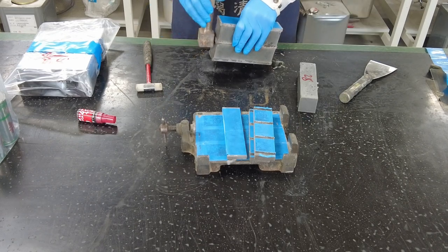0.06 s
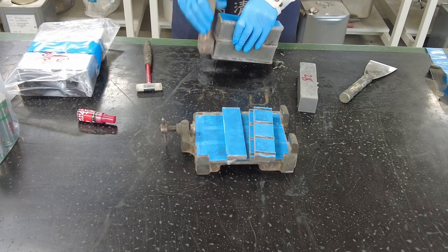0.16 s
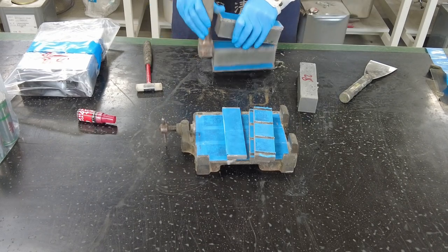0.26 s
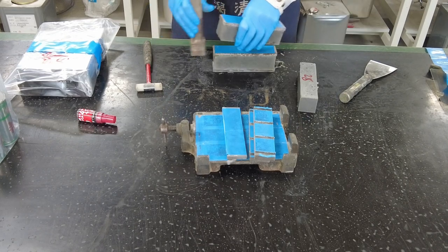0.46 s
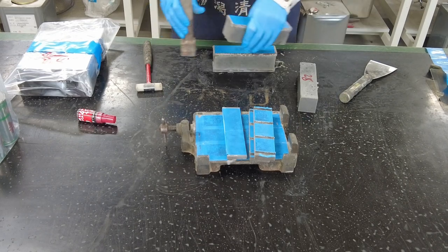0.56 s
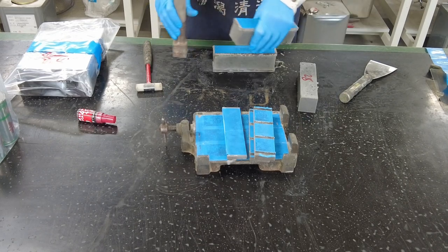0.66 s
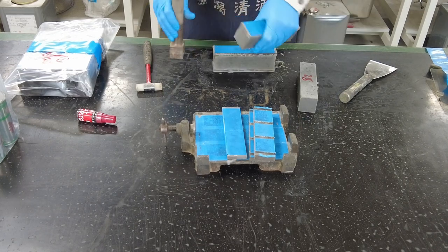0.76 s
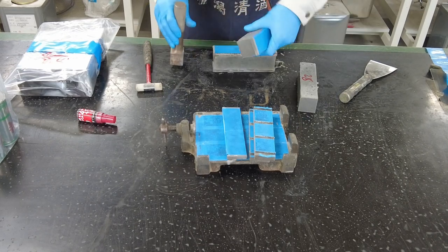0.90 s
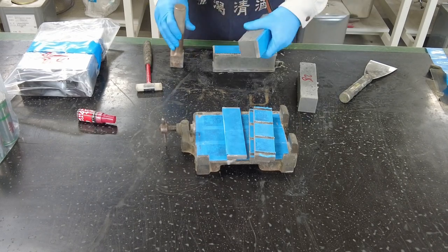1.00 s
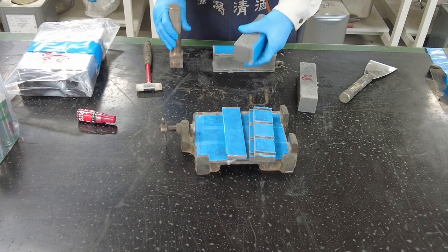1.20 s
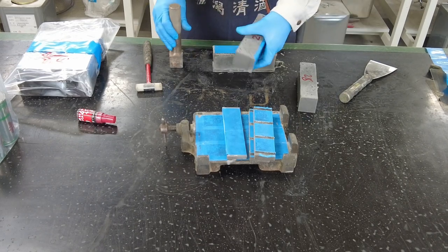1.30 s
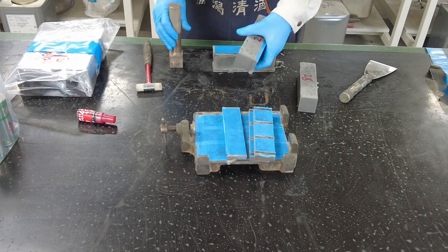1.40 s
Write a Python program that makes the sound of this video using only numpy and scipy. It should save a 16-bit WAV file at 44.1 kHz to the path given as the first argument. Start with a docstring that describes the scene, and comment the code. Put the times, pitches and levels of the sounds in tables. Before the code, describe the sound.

Hard pieces clack together and thud onto a workbench over a steady workshop hum.

```python
"""Mould pieces on a workbench

Hard mould pieces clack together and rasp apart; each impact excites their damped normal modes.
One is set down and rocks to rest in a quick run of thuds that drive the booming modes of the bench top.
Faint brushing and a soft nudge follow. A reverberant workshop prolongs the knocks
over steady ventilation noise and machine hum."""
import sys
import numpy as np
from scipy import signal
from scipy.fft import rfft, irfft
from scipy.io import wavfile

SR = 44100
rng = np.random.default_rng(int(sys.argv[2]) if len(sys.argv) > 2 else 0)


def generate_wav(signal):
    """Clip the signal to [-1, 1] and save it as 16-bit WAV at the path in sys.argv[1]."""
    frames = np.transpose(np.atleast_2d(signal))
    scaled = np.clip(frames, -1, 1) * 32767
    pcm = np.round(scaled).astype(np.int16)
    wavfile.write(sys.argv[1], SR, pcm)


N = 63945


def amp(db):
    """Amplitude ratio of a level in decibels."""
    return 10 ** (np.asarray(db) / 20)


def unit_rms(x):
    """Normalisation to unit mean power."""
    return x / np.sqrt(np.mean(abs(x) ** 2) + 1e-20)


def curve_at(points, hz):
    """Interpolation on a logarithmic frequency axis."""
    f, value = np.transpose(points)
    return np.interp(np.log(hz + 1), np.log(f + 1), value)


def add(mix, start_s, sound):
    """Superposition of a delayed sound on the mix."""
    part = mix[round(start_s * SR):][:len(sound)]
    part += sound[:len(part)]


def correlate_pair(z, correlation):
    """Partial coherence: the weighted sum and difference of two independent signals."""
    correlation = np.clip(correlation, -1, 1)
    mid = np.sqrt((1 + correlation) / 2) * z[0]
    side = np.sqrt((1 - correlation) / 2) * z[1]
    return np.array([mid + side, mid - side])


def click(spectrum, size=2048):
    """Minimum phase: the most compact causal pulse with a given spectrum."""
    log_gain = np.log(amp(curve_at(spectrum, abs(np.fft.fftfreq(size, 1 / SR)))))
    return np.fft.ifft(np.exp(np.conj(signal.hilbert(log_gain)))).real


def ring(modes):
    """Free vibration: a sum of exponentially damped normal modes."""
    t = np.arange(N) / SR
    return sum(amp(db - 60 * t / t60) * np.cos(2 * np.pi * hz * t) for hz, db, t60 in modes)


def highpass(x, low_hz):
    """First-order high-pass: light contacts excite mainly the treble."""
    return signal.sosfilt(signal.butter(1, low_hz, "high", fs=SR, output="sos"), x)


def bandpass(x, low_hz, high_hz):
    """Band-limited excitation: the softer the contact, the lower its upper cutoff."""
    return signal.sosfilt(signal.butter(6, high_hz, fs=SR, output="sos"), highpass(x, low_hz))


# Spectral density of the background air: f/Hz, relative level/dB
AIR_SPECTRUM = [(10, -13), (28, 2.5), (48, -13.5), (72, -16), (100, -18), (170, -21.5), (420, -25),
                (580, -19.5), (700, -21), (880, -23.5), (1050, -30), (1750, -32.5), (2200, -40),
                (2800, -35), (3300, -44.5), (4600, -42.5), (6500, -49.5), (10000, -61.5), (16000, -69)]
# Its left-right coherence: f/Hz, correlation
AIR_COHERENCE = [(30, 0.93), (130, 1), (300, 0.79), (550, 0.3), (800, .1), (1500, 0.45), (3500, .05),
                 (12000, 0.058)]
def air(rms_db=-41.5):
    """Stationary noise: rumble and ventilation hiss, most coherent at long wavelengths."""
    hz = np.fft.rfftfreq(N, 1 / SR)
    white = correlate_pair(rfft(rng.standard_normal((2, N))), curve_at(AIR_COHERENCE, hz))
    return amp(rms_db) * unit_rms(irfft(white * amp(curve_at(AIR_SPECTRUM, hz)), N))


# Machine tones: f/Hz, rms level/dB
HUM_TONES = [(500.6, -53.5), (597.5, -51), (796.7, -66.5), (1174, -66), (1771, -68), (2724, -72.5)]
def machine_hum(waver_depth=0.47, waver_hz=12.5, correlation=0.74):
    """Narrow-band random modulation: machine tones waver on their way across the hall."""
    t, out = np.arange(N) / SR, np.zeros((2, N))
    waver_band = np.exp(-(np.fft.fftfreq(N, 1 / SR) / waver_hz) ** 2)
    steady = np.exp(0.5j * np.arccos(correlation) * np.array([[1], [-1]]))  # left and right phasors
    for hz, db in HUM_TONES:
        noise = rng.standard_normal((2, N)) + 1j * rng.standard_normal((2, N))
        drift = unit_rms(np.fft.ifft(waver_band * noise))
        envelope = steady + waver_depth * correlate_pair(drift, correlation)
        out += amp(db) * unit_rms((envelope * np.exp(2j * np.pi * hz * t)).real)
    return out


# Left-right coherence of the reflections: f/Hz, correlation
ECHO_COHERENCE = [(100, 1), (250, 0.89), (500, 0.43), (900, -0.17), (2000, 0.6), (8000, -0.36)]
def diffuse_noise():
    """Diffuse field: sound from all sides reaches two nearby points alike only in the bass."""
    correlation = curve_at(ECHO_COHERENCE, np.fft.rfftfreq(N, 1 / SR))
    return irfft(correlate_pair(rfft(rng.standard_normal((2, N))), correlation), N)


# Reverberation time of the workshop: f/Hz, T60/s
TAIL_T60 = [(80, 0.93), (250, 1.19), (750, 0.93), (1400, 1.23), (3000, 0.97), (7000, 0.62), (14000, 0.16)]
# Gain of its tail before the build-up is applied: f/Hz, level/dB
TAIL_SPECTRUM = [(60, 1), (150, 3.5), (300, 1), (500, -0.5), (750, 10), (1000, -4), (1400, -1),
                 (2000, -5.5), (4500, -6.5), (7500, -9), (9000, -6), (14000, -18)]
def workshop(x, early_db=-5, early_delay_s=0.0049, early_t60_s=0.16, tail_delay_s=0.004, build_s=0.073):
    """Reverberation: early reflections off bench and shelves, then the hall's exponential tail."""
    t = np.arange(N) / SR
    early = diffuse_noise() * (t > early_delay_s) * amp(-60 * t / early_t60_s)
    early *= amp(early_db) / np.linalg.norm(early[0])
    hz, frame_s, bands = signal.stft(diffuse_noise(), SR, nperseg=512)
    decay_rate = np.log(1000) / curve_at(TAIL_T60, hz)[:, None]
    decay = np.exp(-decay_rate * frame_s) * np.sqrt(2 * decay_rate / SR)  # unit energy in each band
    bands = bands * amp(curve_at(TAIL_SPECTRUM, hz))[:, None] * decay
    tail = signal.istft(bands, SR, nperseg=512)[1][:, :N]
    tail *= np.clip((t - tail_delay_s) / build_s, 0, 1)
    return signal.fftconvolve(x[None], early + tail, axes=1)[:, :N]


# Friction noise: f/Hz, relative level/dB
SCUFF_SPECTRUM = [(100, -22), (7000, -33), (9500, -15), (10800, -13.5), (12300, -11), (13800, -4),
                  (15700, -13.5)]
# Brushing strokes: t/s, rise/s, decay/s, level/dB
SCUFF_STROKES = [(0.3277, .0008, 0.002, -31), (1.044, 0.028, .025, -73), (1.315, 0.011, 0.016, -69)]
def scuffs():
    """Sliding friction: an edge or a glove gives a short, thin hiss."""
    t, out = np.arange(SR // 5) / SR, np.zeros(N)
    for start_s, rise_s, decay_s, db in SCUFF_STROKES:
        hiss = signal.fftconvolve(rng.standard_normal(len(t)), click(SCUFF_SPECTRUM))[:len(t)]
        envelope = np.minimum(t / rise_s, 1) * np.exp(-np.maximum(t - rise_s, 0) / decay_s)
        add(out, start_s, amp(db) * unit_rms(hiss) * envelope)
    return out


# Normal modes of the bench top: f/Hz, level/dB, T60/s
BENCH_TOP_MODES = [(51, -34.5, .22), (100, -39.5, 1.5), (106.7, -33.5, 0.92), (184.9, -29.5, 1.6),
                   (199, -25.5, 0.12), (299.5, -23, 0.096), (404.5, -33, 0.93), (475.7, -27, .09),
                   (536, -20.5, .085), (544, -40.5, 0.92), (659, -41, 0.5), (763, -38, 0.83),
                   (804, -41, 1.1), (973, -20.5, 0.044), (1159, -21, 0.051), (1292, -30, 0.035),
                   (1490, -33, 0.085)]
def bench_top(push_db=20.5):
    """Impulse response of the bench top: a sharp push, then free vibration."""
    response = ring(BENCH_TOP_MODES)
    response[0] += amp(push_db)
    return -response


def nudge(start_s=1.058, gain_db=-11, damping_s=0.085):
    """Added damping: a hand bumps the bench and at once deadens its low modes."""
    t, out = np.arange(N) / SR, np.zeros(N)
    bump = bandpass(bench_top(), low_hz=40, high_hz=102)
    add(out, start_s, amp(gain_db) * bump * np.exp(-t / damping_s))
    return out


# Spectrum of a bare contact: f/Hz, level/dB
CONTACT_SPECTRUM = [(100, -28), (650, 0), (1000, 15), (1900, 1), (3000, 8.5), (3550, 1), (4300, 4.5),
                    (5800, -1), (6500, -6), (8200, 0), (10000, -12.5), (16000, -21)]
def contact(rise_s=0.001, decay_s=0.0019):
    """Rough-surface contact: gritty faces seat in a burst of tiny impacts, heard as a crack."""
    t = np.arange(SR // 40) / SR
    grit = rng.standard_normal(len(t)) * np.minimum(t / rise_s, 1) * np.exp(-t / decay_s)
    return signal.fftconvolve(grit / np.linalg.norm(grit), click(CONTACT_SPECTRUM))


def rasp(start_s=0.243, gain_db=-7.5, catches_per_s=2200, fade_s=0.03):
    """Stick-slip friction: tiny random catches die away as the pieces slide apart."""
    t, out = np.arange(SR // 5) / SR, np.zeros(N)
    catches = rng.standard_normal(len(t)) * (rng.random(len(t)) < catches_per_s / SR)
    catches *= np.exp(-t / fade_s)
    scrape = signal.fftconvolve(catches / np.linalg.norm(catches), contact())
    add(out, start_s, amp(gain_db) * highpass(scrape, low_hz=3000))
    return out


# Normal modes of the mould pieces: f/Hz, level/dB, T60/s
MOULD_MODES = [(1303, -49, .22), (3050, -39, .05), (3844, -43, .28), (3950, -40, .18), (4064, -40, .18),
               (4290, -40, .1), (5265, -45, .1), (7400, -24, .06), (7485, -32, .06), (8000, -37, .05),
               (10050, -45, .24), (11490, -46, .07), (13000, -47, .1), (13600, -40, .2), (14770, -50, .07)]
def mould_ring():
    """Modal vibration: a hard piece rings briefly at high, inharmonic frequencies."""
    return ring(MOULD_MODES)


# Landings on the bench: t/s, thud level/dB, lower f/Hz, upper f/Hz, tick level/dB
LANDINGS = [(0.3066, -12, 60.5, 454, -13), (0.3266, -4, 60, 620, -10), (0.3578, -11.5, 700, 2350, -26.5),
            (.3620, -9.5, 298, 1574, -37), (0.3628, -0.5, 58.6, 481.5, -8), (0.3726, 3.5, 218, 1315, -15.5),
            (0.3761, -11, 510, 1110, -42), (0.3828, -13, 394, 1300, -41), (0.403, -11, 240, 1110, -47)]
def thuds(tick_ring_db=-17):
    """Impact excitation: a rocking piece gives dull thuds with a tick, brighter knocks with less."""
    out, boom = np.zeros(N), bench_top()
    piece_ring = amp(tick_ring_db) * mould_ring()
    for start_s, thud_db, low_hz, high_hz, tick_db in LANDINGS:
        tick = piece_ring.copy()
        add(tick, 0, contact())
        add(out, start_s, amp(thud_db) * bandpass(boom, low_hz, high_hz))
        add(out, start_s, amp(tick_db) * bandpass(tick, low_hz=500, high_hz=7500))
    return out


# Piece against piece: t/s, crack level/dB, ring level/dB, lower f/Hz of the crack
COLLISIONS = [(0.237, 2, 2, 505), (0.2494, -5, -9.5, 2540), (0.255, -3.5, -6, 3500), (0.267, -6, -21, 2850)]
def clacks(ring_rise_s=0.0024):
    """Collision and contact damping: the pieces meet and chatter, ringing less once they touch."""
    t, out = np.arange(N) / SR, np.zeros(N)
    piece_ring = mould_ring() * np.minimum(t / ring_rise_s, 1)
    for start_s, crack_db, ring_db, low_hz in COLLISIONS:
        add(out, start_s, amp(crack_db) * highpass(contact(), low_hz))
        add(out, start_s, amp(ring_db) * piece_ring)
    return out


def scene(balance_db=0.37):
    """Superposition: direct sound from nearly straight ahead, its reverberation and the background."""
    direct = clacks() + rasp() + thuds() + scuffs() + nudge()
    balance = amp([[balance_db], [-balance_db]])
    return (direct + workshop(direct)) * balance + air() + machine_hum()


def record(dry):
    """Clipping at full scale, then a linear-phase low-pass."""
    lowpass = signal.firwin(511, cutoff=16200, window=("kaiser", 9), fs=SR)
    return signal.oaconvolve(np.clip(dry, -1, 1), lowpass[None], "same")


dry = scene()
out = record(dry)
generate_wav(out)
```